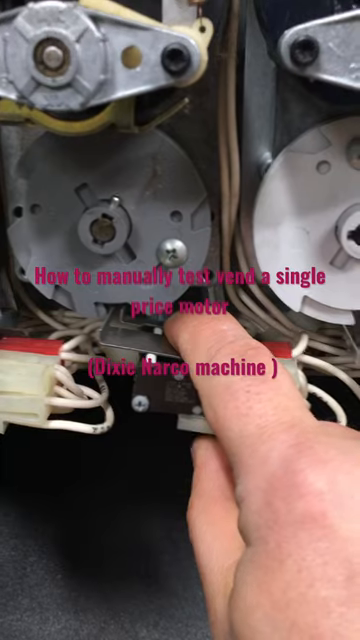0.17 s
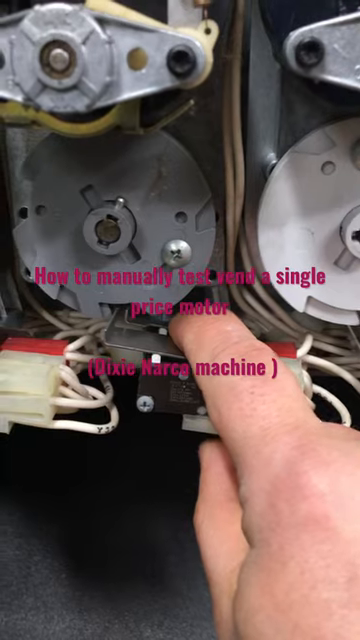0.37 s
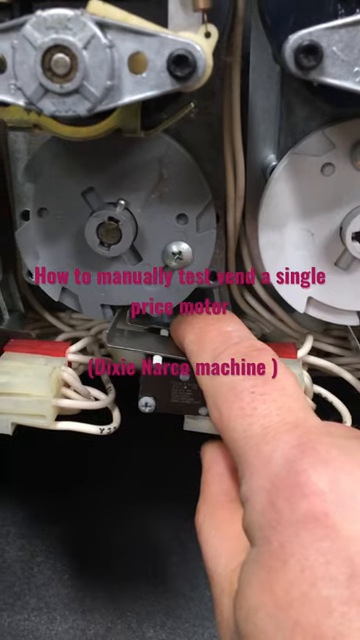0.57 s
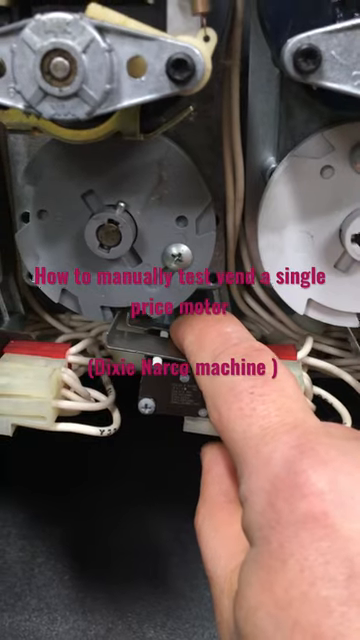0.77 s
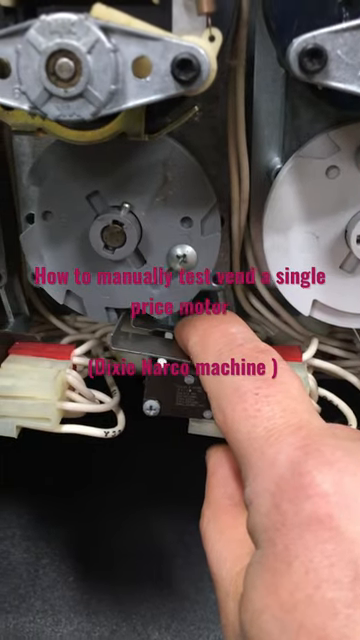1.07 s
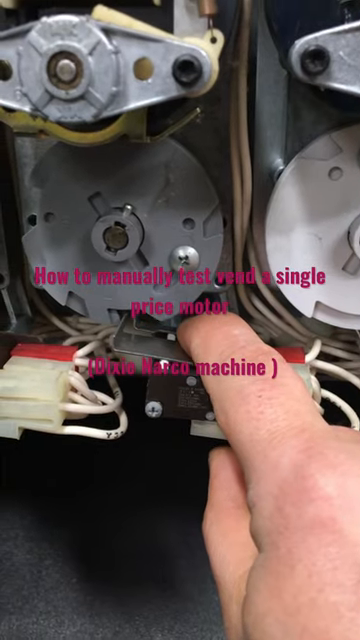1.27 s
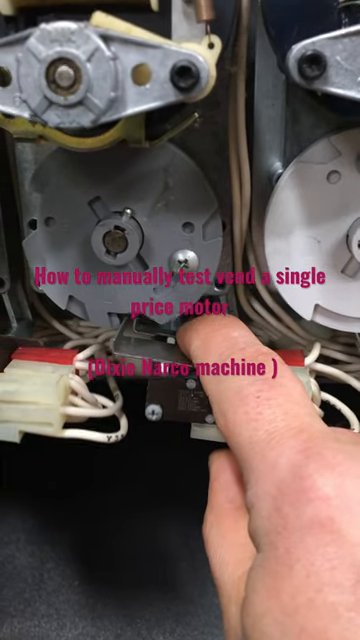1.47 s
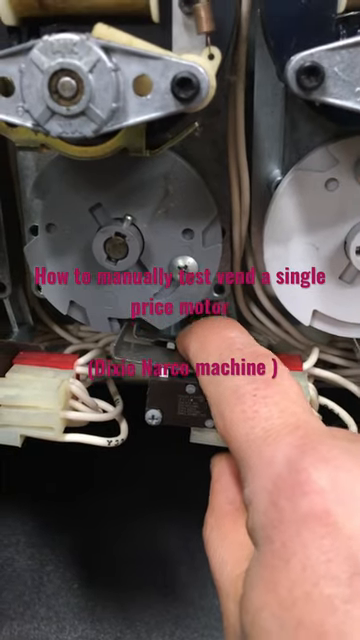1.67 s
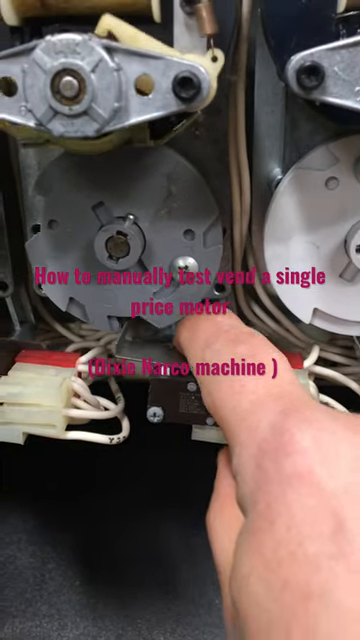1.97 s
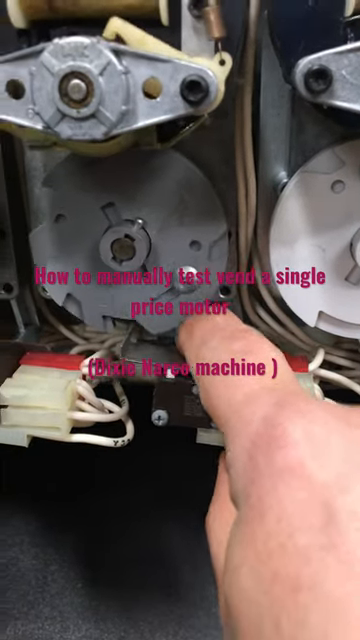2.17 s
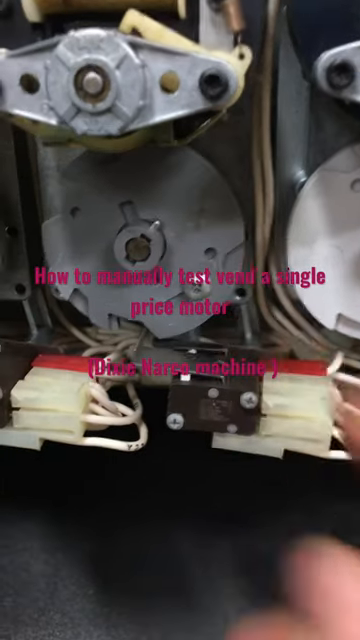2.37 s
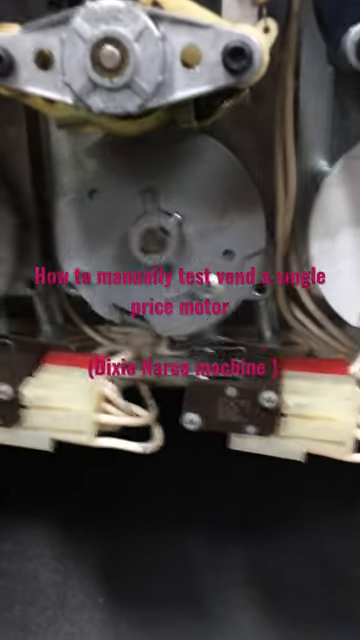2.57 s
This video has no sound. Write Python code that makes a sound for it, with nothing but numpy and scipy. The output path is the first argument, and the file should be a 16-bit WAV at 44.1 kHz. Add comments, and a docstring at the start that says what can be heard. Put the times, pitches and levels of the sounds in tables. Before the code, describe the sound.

A switch click starts a small geared motor, close up inside an open vending machine. From the start, a refrigeration unit hums and a fan rumbles unevenly, continuing throughout. At about 1.9 seconds the switch snaps once, sharply, and the motor immediately whirs and rattles in its metal housing. It slackens briefly around 2.3 seconds, then runs on until about 2.7, with light gear ticks between 2.2 and 2.5 seconds.

```python
"""A refrigeration unit hums and its fan rumbles, close to the open drive bay of a drinks vending machine.
At 1.9 s a finger trips a small lever switch: one sharp snap, and the vend motor starts at once.
Its gear train whirs and rattles in a metal housing, throbbing with the mains, goes slack for a moment
and ticks as the teeth take up their play. Hum and rumble run throughout."""
import sys
import numpy as np
from scipy import signal
from scipy.fft import rfft, irfft
from scipy.io import wavfile

SR = 44100
rng = np.random.default_rng(int(sys.argv[2]) if len(sys.argv) > 2 else 0)


def bounce(signal):
    """Save signal as a 16-bit WAV file at the path given by the first command-line argument."""
    frames = np.transpose(np.atleast_2d(signal))
    limited = np.clip(frames, -1, 1)
    pcm = np.round(limited * 32767).astype(np.int16)
    wavfile.write(sys.argv[1], SR, pcm)


N = 120393
T = np.arange(N) / SR
FREQS = np.fft.rfftfreq(N, 1 / SR)


def from_db(db):
    return 10 ** (np.asarray(db) / 20)


def unit_rms(x):
    return x / np.sqrt(np.mean(x ** 2) + 1e-20)


def colour(points):
    """Gain per FFT bin from (freq_hz, gain_db) points."""
    hz, db = np.transpose(points)
    return from_db(np.interp(np.log(FREQS + 1), np.log(hz), db))


def resonance(hz, width_hz):
    """Band-pass response, peak gain 1."""
    return 1j * FREQS * width_hz / (hz ** 2 - FREQS ** 2 + 1j * FREQS * width_hz)


def filtered(x, response):
    return irfft(rfft(x) * response, N)


def noise(response):
    """Shaped noise, rms 1."""
    return unit_rms(filtered(rng.standard_normal(N), response))


def drift(rate_hz):
    """Slow random wander, rms 1."""
    return noise(1 / (1 + (FREQS / rate_hz) ** 2))


def sine(hz, waver_rad=0):
    """Tone of random phase, rms 1."""
    return np.sqrt(2) * np.sin(2 * np.pi * (hz * T + rng.random()) + waver_rad)


def contour_db(points):
    return np.interp(T, *np.transpose(points))


def decay(start_s, t60_s):
    return (T >= start_s) * from_db(-60 * np.clip((T - start_s) / t60_s, 0, 5))


def fade_in(full_at_s, rise_s):
    return np.clip((T - full_at_s) / rise_s + 1, 0, 1)


def refrigeration_hum():
    """Steady compressor tones, plus a low tone that swells and fades."""
    # compressor tones: pitch_hz, level_db
    tones = [(119.9, -26), (703.6, -37), (730.1, -39.5), (783, -54.5)]
    # low tone envelope: time_s, level_db
    swell_levels = [(.4, -54.5), (.7, -35.5), (1.45, -39.5), (1.8, -52), (2.6, -37.5)]
    waver_db, waver_rad = -0.07, 0.8
    hum = sum(from_db(db + waver_db * drift(rate_hz=6.6)) * sine(hz) for hz, db in tones)
    swell = from_db(contour_db(swell_levels)) * sine(264.8, waver_rad * drift(rate_hz=4.4))
    return hum + swell


def fan():
    """The fan rushes air and shakes the cabinet panels: a lumpy rumble and a higher resonance."""
    # panel rumble envelope: time_s, level_db
    rumble_levels = [(.05, -31), (.1, -21), (.16, -30), (.24, -22), (.31, -35), (.39, -25), (.56, -28.5),
                     (.62, -37.5), (.7, -20), (.86, -33.5), (.97, -22.5), (1.03, -32.5), (1.1, -25.5),
                     (1.18, -38), (1.27, -20.5), (1.34, -28.5), (1.72, -24.5), (1.8, -36), (1.85, -22.5),
                     (1.92, -35.5), (1.99, -24), (2.18, -26), (2.23, -36), (2.3, -23), (2.41, -28),
                     (2.57, -21.5), (2.72, -26)]
    # rushing air spectrum: freq_hz, gain_db
    air_spectrum = [(25, -37), (50, -12.5), (140, -6), (190, 0.5), (290, -2.5), (330, -6), (420, -2),
                    (480, -8.5), (560, -2), (680, -9.5), (830, -10.5), (930, -10), (1400, -19), (2400, -24),
                    (2900, -29.5), (3900, -30), (4900, -38), (5800, -37.5), (7800, -45.5), (16000, -58)]
    rumble_hz, waver_rad = 97.6, 1.69
    rumble = from_db(contour_db(rumble_levels)) * sine(rumble_hz, waver_rad * drift(rate_hz=6))
    low_cut = np.clip(2 * FREQS / rumble_hz - 1, 0, 1) ** .5  # nothing below half the pitch
    panel = from_db(-41) * noise(resonance(250.9, width_hz=44.5) ** 3)
    air = from_db(-33.5) * noise(colour(air_spectrum))
    return filtered(rumble, low_cut) + panel + air


def lever_switch():
    """Impacts within milliseconds; each cracks, rings the switch and echoes in the steel bay."""
    # impacts, first slip to rebound: start_s, level_db
    impacts = [(1.9047, -20), (1.908, -13), (1.9094, -2), (1.91, 1), (1.9111, -4), (1.913, -6)]
    # switch and bracket modes: pitch_hz, level_db, t60_s
    modes = [(1787, -28, 0.097), (3667, -20.5, 0.026), (7270, -23, 0.029), (7490, -17.5, 0.024),
             (8600, -19, .025), (8870, -15.5, 0.022), (11050, -22, .025), (12430, -17, 0.018),
             (13010, -21, 0.018)]
    # contact crack spectrum: freq_hz, gain_db
    crack_spectrum = [(300, -33), (1300, 0.5), (2600, -5.5), (5000, -3.5), (8500, -2), (12000, -2),
                      (16000, -3.5)]
    # bay echo spectrum: freq_hz, gain_db
    echo_spectrum = [(400, -25), (1150, 5), (1450, 2), (1800, 6), (2300, -7), (4200, -6), (9000, -7),
                     (16000, -33)]

    def struck(t60_s, rise_s=0.00022):
        """Impact envelopes, summed in power."""
        envelopes = (from_db(db) * decay(start_s, t60_s) * np.clip((T - start_s) / rise_s, 0, 1)
                     for start_s, db in impacts)
        return np.sqrt(sum(envelope ** 2 for envelope in envelopes))

    crack = from_db(-10) * noise(colour(crack_spectrum)) * struck(t60_s=0.015)
    echo = from_db(-30) * noise(colour(echo_spectrum)) * struck(t60_s=0.14)
    ring = sum(from_db(db) * struck(t60_s) * sine(hz) for hz, db, t60_s in modes) / np.sqrt(2)
    return crack + ring + echo


def gear_ticks():
    """Teeth take up their play as the load shifts: bright knocks, one resonance each."""
    # knocks: start_s, level_db, ring_hz, ring_db
    knocks = [(2.2235, -23, 6500, 11), (2.2277, -21, 14000, 4), (2.2991, -25.5, 3400, 14),
              (2.383, -30, 6440, 7), (2.415, -29, 6360, 17), (2.514, -27.5, 8650, 8), (2.524, -24, 4280, 2),
              (2.527, -24, 1250, 27)]
    # knock spectrum: freq_hz, gain_db
    spectrum = [(500, -16), (2000, -8), (3400, -4.5), (7800, -2.5), (9600, 0), (10700, -3.5), (13200, 4.5),
                (16000, -8)]
    ticks = np.zeros(N)
    for start_s, level_db, ring_hz, ring_db in knocks:
        ring = 1 + from_db(ring_db) * resonance(ring_hz, width_hz=450)
        ticks += from_db(level_db) * decay(start_s, t60_s=0.015) * noise(colour(spectrum) * ring)
    return ticks


def gear_whir():
    """Tooth contacts and rubbing, pulsing with mesh and mains, ring the housing; rms 1."""
    # broad gearbox spectrum: freq_hz, gain_db
    spectrum = [(200, -14), (600, -0.5), (1250, 4), (1650, 0), (2300, 1.5), (2700, 5), (3000, -1),
                (3500, 0.8), (5300, -4), (6400, -2), (7900, -7.5), (9600, -2), (10400, -11.5), (11100, -6),
                (13000, -5), (16000, -12)]
    # housing resonances: centre_hz, width_hz, gain_db
    modes = [(918, 43, 8.5), (1980, 46, 4.5), (2830, 125, 10), (4060, 70, 6), (4260, 140, 7.5),
             (5780, 130, 6), (6290, 140, 10), (6630, 110, 6.5), (6900, 80, 4), (7150, 50, 13.5),
             (7240, 55, 6.5), (8650, 190, -3), (12500, 200, 1), (13100, 110, 7)]
    contacts_per_s, spread_db, rattle_db = 3500, 2.5, 1.34
    mesh_hz, throb_hz = 391.0, 119.9
    strengths = from_db(spread_db * np.minimum(rng.exponential(1, N), 4)) * rng.choice([-1, 1], N)
    contacts = unit_rms(strengths * (rng.random(N) < contacts_per_s / SR))
    rubbing = from_db(-4) * rng.standard_normal(N)
    mesh = 0.12 * np.cos(2 * np.pi * mesh_hz * T)
    throb = 0.17 * np.cos(2 * np.pi * throb_hz * T)
    rattle = from_db(rattle_db * drift(rate_hz=57))
    drive = (contacts + rubbing) * np.exp(mesh + throb) * rattle
    mode_power = sum(abs(from_db(db) * resonance(hz, width_hz) ** 2) ** 2 for hz, width_hz, db in modes)
    housing = colour(spectrum) * np.sqrt(1 + mode_power)
    return unit_rms(filtered(drive, housing))


def vend_motor():
    """The gear train whirs and whines, brighter when louder, and briefly goes slack."""
    # gear train envelope: time_s, level_db
    levels = [(1.93, -35.5), (2.07, -33.5), (2.12, -34.5), (2.18, -33), (2.225, -33), (2.255, -41),
              (2.3, -42.5), (2.335, -34.5), (2.41, -32), (2.495, -35.5), (2.526, -30), (2.575, -36.5),
              (2.66, -31.7), (2.73, -35.5)]
    # gear whine partials: pitch_hz, level_re_whir_db
    partials = [(958, -20), (1239, -16), (1303, -17.5), (1359, -29), (2148, -19), (2233, -20),
                (2403, -18.5), (2878, -16.5)]
    start_s, waver_db, waver_rad = 1.925, 2.5, 1.2
    treble_hz, treble_db_per_db = 7500, 0.29
    whir = gear_whir()
    whine = sum(from_db(db + waver_db * drift(rate_hz=12)) * sine(hz, waver_rad * drift(rate_hz=12))
                for hz, db in partials)
    level_db = contour_db(levels)
    swing_db = level_db - level_db[T > start_s].mean()
    treble = filtered(whir, FREQS ** 4 / (FREQS ** 4 + treble_hz ** 4))
    brightening = (from_db(treble_db_per_db * swing_db) - 1) * treble
    return (whir + brightening + whine) * from_db(level_db) * fade_in(start_s, rise_s=0.0062)


def scene():
    return (refrigeration_hum() + fan() + lever_switch() + vend_motor() + gear_ticks())[None]


def record(dry):
    """Brief opening silence, soft peak limit, steep low-pass."""
    peak_limit, cutoff_hz = 0.8, 15700
    opened = dry * fade_in(full_at_s=0.0385, rise_s=0.0035)
    rounded = opened / (1 + (opened / peak_limit) ** 6) ** (1 / 6)
    low_pass = signal.ellip(12, .1, 80, cutoff_hz, fs=SR, output="sos")
    return signal.sosfilt(low_pass, rounded)


dry = scene()
out = record(dry)
bounce(out)
```